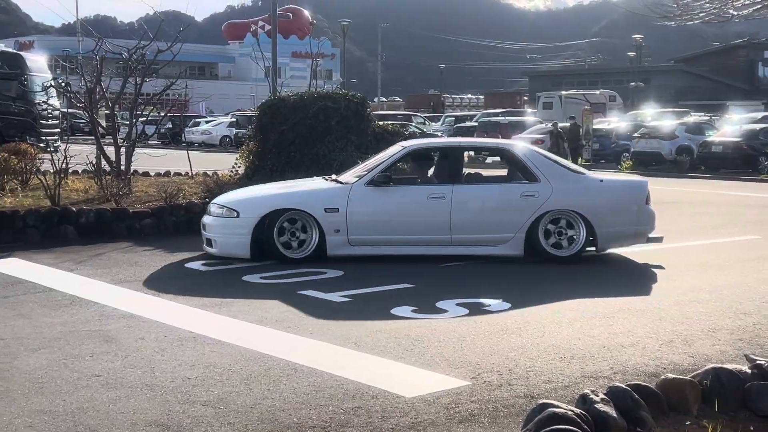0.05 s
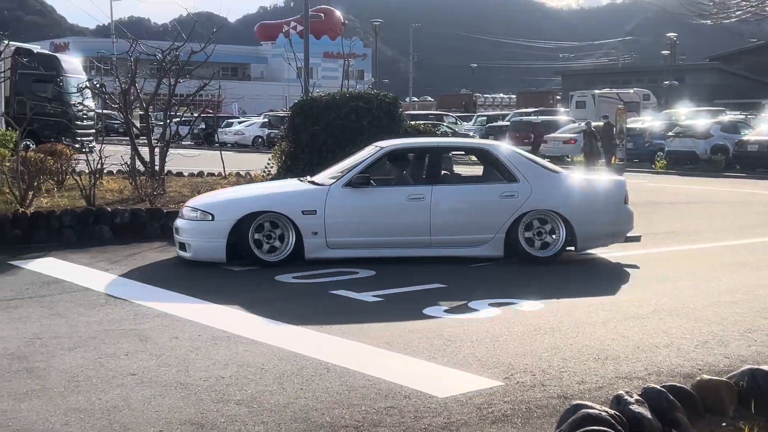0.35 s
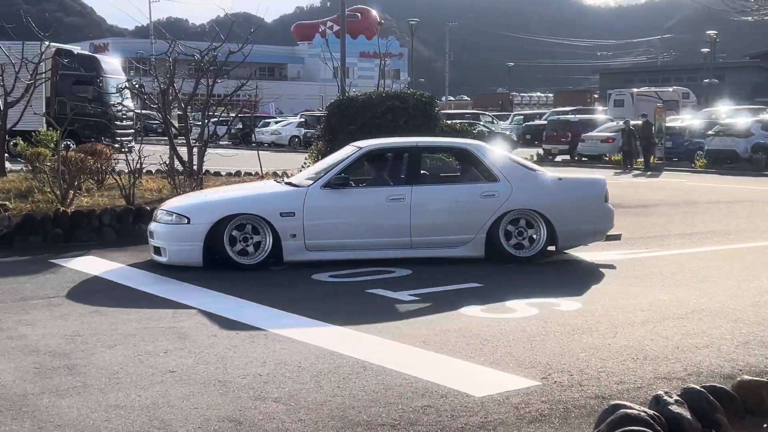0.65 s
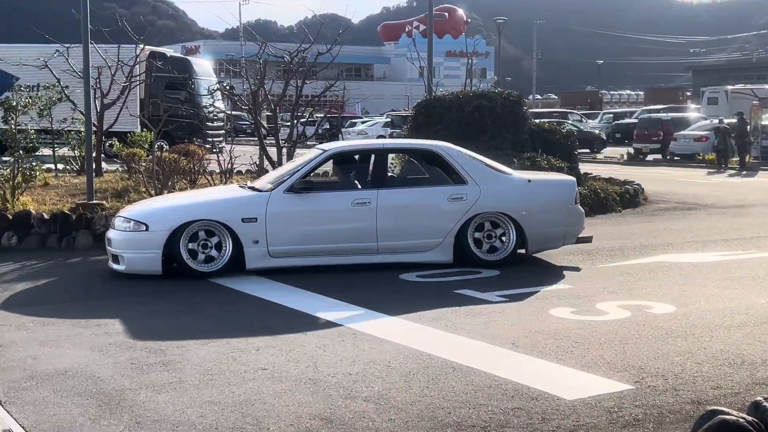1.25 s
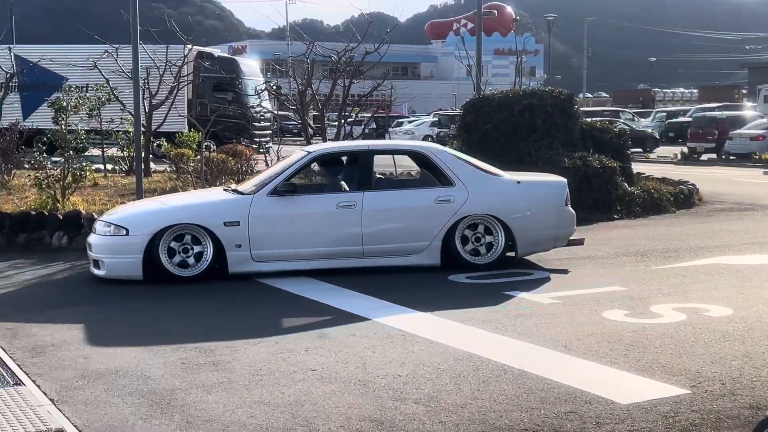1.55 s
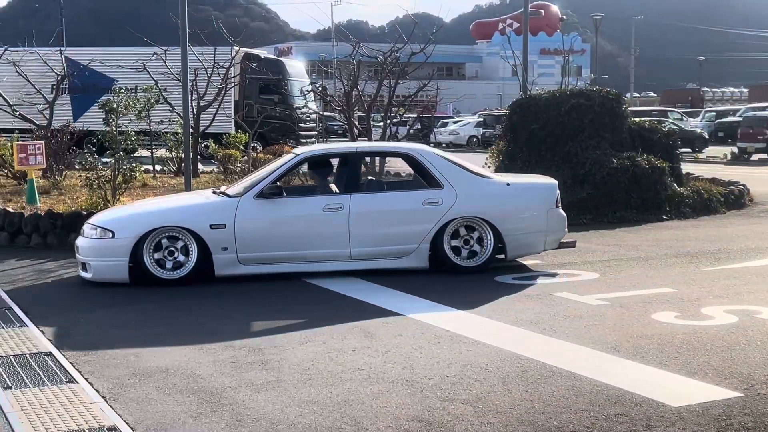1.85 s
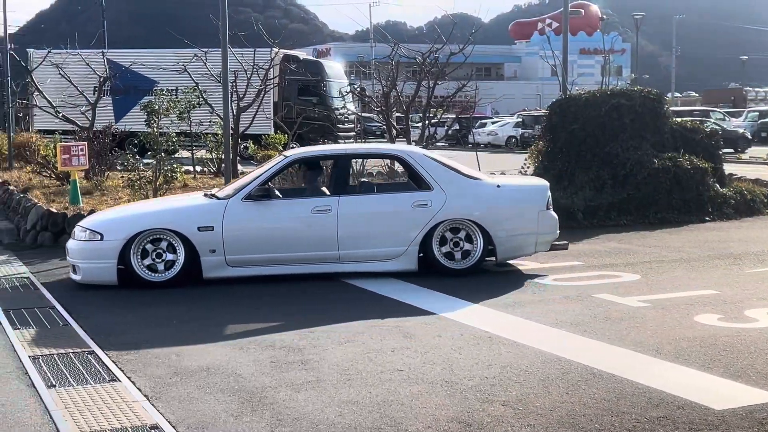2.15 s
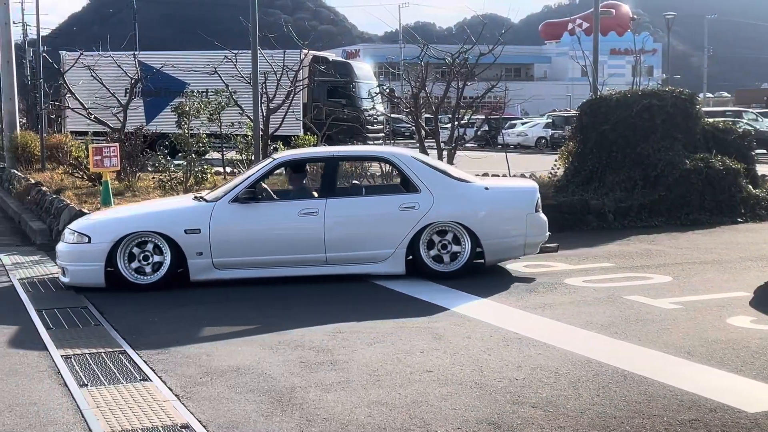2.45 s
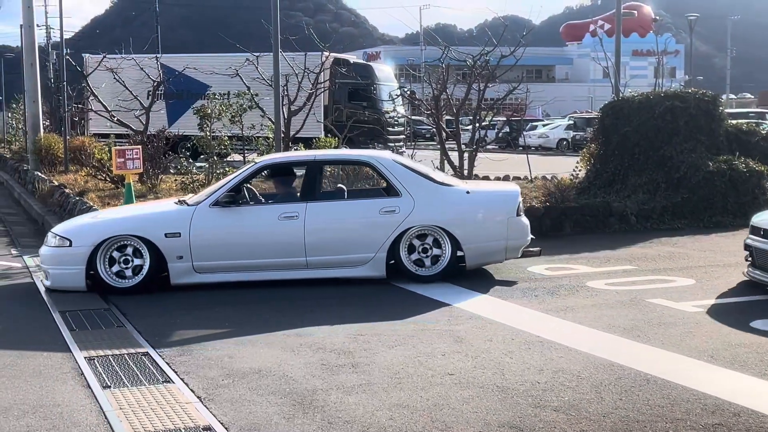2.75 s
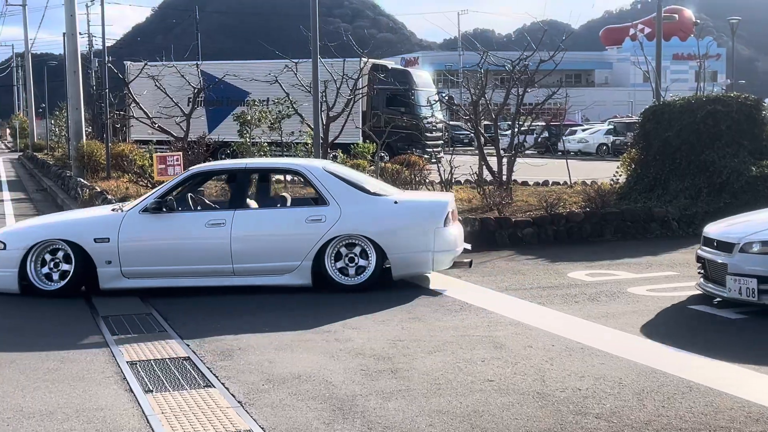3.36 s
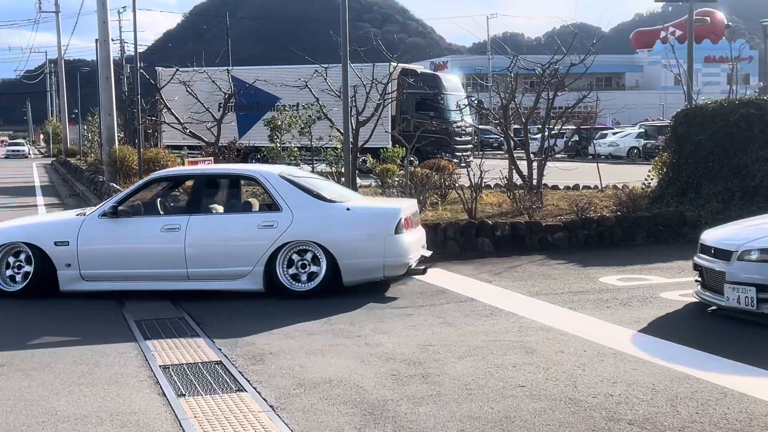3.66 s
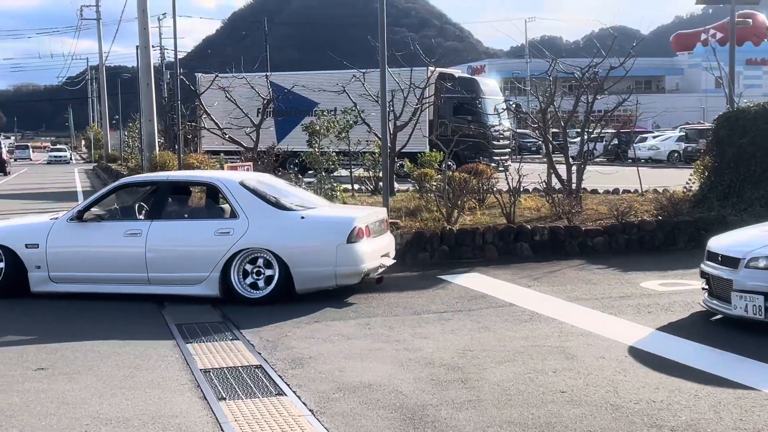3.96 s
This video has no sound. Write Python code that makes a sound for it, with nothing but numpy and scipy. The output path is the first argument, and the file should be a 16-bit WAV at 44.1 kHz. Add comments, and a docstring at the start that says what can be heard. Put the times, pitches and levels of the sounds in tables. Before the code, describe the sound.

A car rumbles slowly past, then throttles up lightly and clanks over a drain grate.

```python
"""A six-cylinder car with a big exhaust creeps through a parking lot at little over idle.
Uneven firings boom and burble in the pipe; the engine's clatter swells once per cycle.
Near three seconds the throttle opens: puffs of gas rasp and spit, a tyre clanks and crunches over
a drain grate, a weaker knock follows, and the boom stays louder as the tailpipe comes round.
Behind it all sit a faint hiss, a few high ticks and the lot's weak reflections."""
import sys
import numpy as np
from scipy import signal
from scipy.fft import rfft, irfft
from scipy.io import wavfile
from scipy.ndimage import uniform_filter1d, minimum_filter1d

SR = 44100
rng = np.random.default_rng(int(sys.argv[2]) if len(sys.argv) > 2 else 0)


def output_pcm(signal):
    """Save a mono or channel-first signal as 16-bit PCM at the path in sys.argv[1].

    Samples are clipped to [-1, 1] before scaling.
    """
    pcm = np.clip(np.atleast_2d(signal).T, -1, 1) * 32767
    wavfile.write(sys.argv[1], SR, np.round(pcm).astype(np.int16))


N = 176400
T = np.arange(N) / SR

# engine speed as firing rate: t/s, f/Hz
FIRING_RATE = [(0, 44.1), (.3, 44.5), (.55, 46), (.8, 47), (1, 49.5), (1.2, 52.2), (1.6, 52.4), (2, 51.8),
               (2.5, 52.3), (2.65, 51.9), (2.8, 51.1), (2.92, 45.5), (3.1, 49.8), (3.2, 54.3), (3.3, 57.6),
               (3.45, 55.4), (3.6, 51), (3.72, 51.7), (3.85, 60), (4, 58.8)]
# boom envelopes at one, two and three times the firing rate: t/s, level/dB
BOOM_1_ENV = [(0, -44), (2.85, -43), (3.1, -26), (3.22, -15), (3.36, -14.5), (3.5, -24), (3.68, -27),
              (3.8, -19), (3.9, -12), (4, -11)]
BOOM_2_ENV = [(0, -22), (.12, -28), (.3, -22.5), (.43, -28), (.6, -24), (.72, -29), (.95, -19),
              (1.1, -17.5), (1.2, -20), (1.45, -21), (1.95, -17.5), (2.38, -20.5), (2.47, -15.5),
              (2.56, -20.5), (2.8, -20.5), (2.88, -26), (2.97, -17), (3.07, -16.5), (3.18, -9.5),
              (3.28, -22), (3.46, -19), (3.56, -11), (3.74, -12), (3.82, -25), (4, -22)]
BOOM_3_ENV = [(0, -34), (.6, -33), (.75, -25.5), (1.03, -18.5), (1.25, -31), (2.85, -32), (3, -22.5),
              (3.15, -19.5), (3.3, -27), (3.5, -29), (3.7, -24), (3.8, -30), (3.95, -21.5)]
# the boom wavers more at low speed: firing rate/Hz, rms depth/dB
BOOM_WAVER = [(44, 3), (52, 1), (58, .4)]
# exhaust accent of each cylinder in firing order: level/dB
PULSE_ACCENTS = [-1, -3.5, 1, -4.5, 2.5, 1]
# envelope shared by burble and overtones: t/s, level/dB
PIPE_ENV = [(0, -27), (.6, -26.5), (1.1, -23), (1.8, -22), (2.3, -22.7), (2.85, -22.7), (3, -19.3),
            (3.2, -16), (3.4, -18.5), (3.65, -19.3), (3.8, -17.8), (4, -18.8)]
# exhaust tone at idle and on throttle: f/Hz, level/dB
PIPE_IDLE_EQ = [(20, -24), (36, -12.5), (52, -2), (70, 2.5), (88, 7), (112, -1.5), (135, 4), (160, -8),
                (185, -0.5), (215, -2), (245, -9), (285, -7), (310, -8.5), (338, -6), (370, -9),
                (450, -10.5), (520, -11), (590, -20), (680, -20), (780, -24.5), (1000, -35), (2000, -49),
                (5000, -86.5)]
PIPE_OPEN_EQ = [(20, -42.5), (36, -12.5), (52, 4.5), (90, 5), (125, 12), (160, -1), (220, -1.5), (255, -10),
                (290, -7), (335, -9.5), (385, -6), (450, -4), (530, -6), (610, -12), (680, -14),
                (780, -22.5), (1000, -25), (2000, -56.5), (5000, -86)]
# pipe overtones, riding on PIPE_ENV: multiple of the firing rate, idle level/dB, throttle level/dB
PIPE_OVERTONES = [(2.5, -14, -13), (3.5, -9, -11), (4, -6, -5), (4.5, -17, -20), (5, -17, -11),
                  (5.5, -13.5, -20), (6, -21, -13), (6.5, -21, -24), (7, -22, -18), (8, -23, -15),
                  (9, -22, -17), (9.5, -25, -17), (10, -25, -18)]
# narrow pipe resonances: f/Hz, width/Hz, boost/dB
PIPE_RESONANCES = [(334, 24, 7), (517, 36, 7)]
# rasp envelope: t/s, level/dB
RASP_ENV = [(2.9, -53), (2.935, -44), (3.08, -45.5), (3.16, -39), (3.25, -40), (3.36, -46), (3.65, -50.5),
            (4, -48.5)]
# tone of rasp and spits: f/Hz, level/dB
RASP_EQ = [(500, -40), (1500, 10), (2200, -0.5), (2600, -3.5), (3300, 2.5), (4000, -1), (5250, -3),
           (6100, -11), (7400, -11), (8800, -14), (10000, -9), (13000, -22.5), (15500, -22.5)]
# the tailpipe's hardest spits: t/s, level/dB
SPIT_CUES = [(2.924, -36), (2.945, -35), (2.986, -37), (3.109, -35), (3.129, -36), (3.148, -29.5),
             (3.184, -31), (3.239, -28), (3.257, -31), (3.31, -31)]
# clatter envelope: t/s, level/dB
CLATTER_ENV = [(0, -44.5), (.7, -44), (1, -41.5), (1.8, -41), (2.88, -42), (2.96, -32), (3.1, -33),
               (3.25, -27), (3.4, -35), (3.7, -37), (4, -34.5)]
# clatter accent of each cylinder in firing order: level/dB
CLATTER_ACCENTS = [7, 11, 2.5, 4, -2.5, -2]
# clatter tone at idle and on throttle: f/Hz, level/dB
CLATTER_IDLE_EQ = [(400, -25.5), (750, -3.5), (890, -5.5), (950, -1.5), (1015, 4.5), (1090, -5.5),
                   (1220, -5), (1350, -5.5), (1500, -12), (1750, -15.5), (2200, -38), (3000, -27),
                   (4000, -37.5), (8000, -52.5)]
CLATTER_OPEN_EQ = [(400, -12.5), (720, 1.5), (880, 4.5), (1020, 3), (1150, 1), (1240, 1.5), (1345, 5),
                   (1480, -20.5), (1650, -4.5), (1850, -13), (2400, -16), (4000, -48.5), (8000, -50.5)]
# metallic clanks, the tyre on the grate, then a weaker knock with the engine's beat: t/s, level/dB
CLANK_CUES = [(3.183, -17.5), (3.202, -28), (3.309, -28)]
# metallic ring of the clanks: f/Hz, level/dB, t60/s
CLANK_MODES = [(1303, -3, .07), (1365, 0, .055), (1490, -6, .07), (1680, -4, .06), (1790, -9, .05),
               (3273, -21, .05), (3585, -19, .05)]
# envelope of the grit under the tyre: t/s, level/dB
GRIT_ENV = [(3.1, -70), (3.15, -40), (3.19, -38), (3.25, -47), (3.33, -52), (3.42, -90)]
# grit tone: f/Hz, level/dB
GRIT_EQ = [(800, -23), (2500, 8), (5000, 1), (8000, -8.5), (12000, -11.5), (15500, -8.5)]
# envelope of the lot's far hiss: t/s, level/dB
HISS_ENV = [(0, -55.5), (.8, -56), (2, -54), (4, -54.5)]
# hiss tone: f/Hz, level/dB
HISS_EQ = [(1200, -13.5), (2000, 5.5), (2700, 3), (4800, -9.5), (8400, -14.5), (10000, -15), (15000, -27.5)]
# small high ticks: t/s, level/dB, decay/s, f/Hz
TICK_CUES = [(.53, -56, .028, 7200), (2.16, -63, .05, 7000), (2.353, -51.5, .006, 8000)]
# tick tone: multiple of the tick's pitch, level/dB
TICK_EQ = [(.4, -26), (.6, -7), (.8, -3), (1, 0), (1.15, -1), (1.35, -20), (1.6, -40)]
# phase between the two microphone ports: f/Hz, left lead/rad
STEREO_PHASE = [(0, 0), (6500, 0), (7600, -.3), (8400, -1.1), (9000, -2.1), (9500, -2.8), (10500, -3.3),
                (11000, -3.8), (11700, -4.8), (13000, -6.2), (15000, -7.3)]

BOOM_TRIM_DB, BURBLE_TRIM_DB, CLATTER_TRIM_DB, RASP_TRIM_DB = -0.09, 2.15, -0.24, 2
CYLINDER_COUNT = 6


def boom(turns, lag=0.34):
    """The low end: three nearly pure, wavering orders trail each pulse by lag of a firing interval."""
    waver_db = np.interp(curve(FIRING_RATE), *np.transpose(BOOM_WAVER))
    out = np.zeros(N)
    for order, envelope in enumerate([BOOM_1_ENV, BOOM_2_ENV, BOOM_3_ENV], 1):
        tone = unit(np.cos(2 * np.pi * order * (turns - lag)))
        out += amp(curve(envelope) + waver_db * drift(hz=9.1)) * tone
    return amp(BOOM_TRIM_DB) * out


def burble(turns, puff_share=.8):
    """Uneven pressure pulses and their puffs of gas ring the pipe, surging each cycle on throttle."""
    clicks = firings(turns, PULSE_ACCENTS)
    gas = puffs(clicks, turbulence(turns), decay_s=.009, steady=1.0)
    drive = (1 - puff_share) * unit(clicks) + puff_share * gas
    surge_db = throttle() * cycle_swell(turns, depth_db=2.4)
    gain = amp(BURBLE_TRIM_DB + curve(PIPE_ENV) + surge_db)
    return gain * throttle_eq(drive, PIPE_IDLE_EQ, PIPE_OPEN_EQ)


def overtones(turns, waver_db=1.5):
    """Whole and half multiples of the firing rate; each swells as it glides through a pipe resonance."""
    out = np.zeros(N)
    for order, idle_db, open_db in PIPE_OVERTONES:
        pitch = order * curve(FIRING_RATE)
        ring_db = sum(db / (1 + (2 * (pitch - hz) / width) ** 2) for hz, width, db in PIPE_RESONANCES)
        level = idle_db + (open_db - idle_db) * throttle() + ring_db + waver_db * drift(hz=12)
        out += amp(level) * unit(np.cos(2 * np.pi * (order * turns + rng.random())))
    return amp(curve(PIPE_ENV)) * out


def rasp(turns):
    """Bright puffs of gas at the tailpipe once the throttle opens, with a few hard spits on top."""
    gas = puffs(firings(turns, PULSE_ACCENTS), rng.standard_normal(N), decay_s=.0087, steady=1.3)
    gain = amp(RASP_TRIM_DB + curve(RASP_ENV)) * (T >= RASP_ENV[0][0])
    spits = sum(amp(db) * burst(start, decay_s=.0045) for start, db in SPIT_CUES)
    return gain * eq(gas, RASP_EQ) + spits * eq(rng.standard_normal(N), RASP_EQ)


def clatter(turns, lead=.4):
    """Metallic engine chatter, lead of a firing interval before each pulse, swelling once per cycle."""
    clicks = firings(turns + lead, CLATTER_ACCENTS, uneven=.25, jitter_s=.0001)
    swell = amp(cycle_swell(turns, depth_db=4.8))
    drive = swell * puffs(clicks, turbulence(turns), decay_s=.0077, steady=1.3)
    gain = amp(CLATTER_TRIM_DB + curve(CLATTER_ENV))
    return gain * throttle_eq(drive, CLATTER_IDLE_EQ, CLATTER_OPEN_EQ)


def firings(turns, accents_db, uneven=.1, jitter_s=.0006):
    """One click per firing, accented by its cylinder and a little loose in timing and strength."""
    beats = np.flatnonzero(np.diff(np.floor(turns), prepend=-1))
    timing, strength = rng.standard_normal((len(beats), 2)).T
    onsets = np.clip(beats + (timing * jitter_s * SR).astype(int), 0, N - 1)
    clicks = np.zeros(N)
    clicks[onsets] = amp(np.resize(accents_db, len(beats))) * np.exp(uneven * strength)
    return clicks


def puffs(clicks, flow, decay_s, steady):
    """Each click lets through a dying burst of the noisy flow, over a steady bed of it."""
    gate = unit(signal.lfilter([1], [1, -np.exp(-1 / (decay_s * SR))], clicks))
    return unit((gate + steady) * flow)


def turbulence(turns, loop_share=.5, size=5000):
    """Flow noise: part loops with the engine cycle, part is always fresh."""
    loop = rng.standard_normal(size)[(turns / CYLINDER_COUNT % 1 * size).astype(int)]
    return np.sqrt(loop_share) * loop + np.sqrt(1 - loop_share) * rng.standard_normal(N)


def cycle_swell(turns, depth_db, peak_phase=.57):
    """One rise and fall in dB per engine cycle."""
    return depth_db * np.cos(2 * np.pi * (turns / CYLINDER_COUNT - peak_phase))


def throttle(opens_s=2.9, rise_s=.029):
    """How far the throttle is open, 0 to 1."""
    return np.clip((T - opens_s) / rise_s, 0, 1)


def throttle_eq(x, idle, opened):
    """Crossfades from the idle tone to the open-throttle tone."""
    return (1 - throttle()) * eq(x, idle) + throttle() * eq(x, opened)


def clanks(attack_s=.0015):
    """Short metallic clanks: the tyre on the grate, then a weaker knock with the engine's beat."""
    out = np.zeros(N)
    for start, db in CLANK_CUES:
        t = np.maximum(T - start, 0)
        ring = sum(amp(level - 60 * t / t60) * np.sin(2 * np.pi * (hz * t + rng.random()))
                   for hz, level, t60 in CLANK_MODES)
        out += amp(db) * np.minimum(t / attack_s, 1) * ring
    return out


def grit(grains_per_s=2200, spread_db=3):
    """The crunch: separate grains crack under the tyre as it crosses the grate."""
    cracks = rng.random(N) < grains_per_s / SR
    strength = amp(spread_db * np.minimum(rng.exponential(1, N), 3))
    grains = cracks * strength * rng.choice([-1, 1], N)
    return amp(curve(GRIT_ENV)) * eq(grains, GRIT_EQ)


def lot_ambience():
    """A faint bed of far hiss with a few small high ticks."""
    ticks = np.zeros(N)
    for start, db, decay_s, hz in TICK_CUES:
        tone = [(hz * ratio, level) for ratio, level in TICK_EQ]
        ticks += amp(db) * burst(start, decay_s) * eq(rng.standard_normal(N), tone)
    return amp(curve(HISS_ENV)) * eq(rng.standard_normal(N), HISS_EQ) + ticks


def reflections(send, t60_s=.2, taps_per_s=2000, predelay_s=.004):
    """The lot scatters the sound back as a short, sparse reverb."""
    t = T[:SR // 2]
    taps = rng.standard_normal(len(t)) * (rng.random(len(t)) < taps_per_s / SR)
    taps *= amp(-60 * t / t60_s) * (t > predelay_s)
    return signal.fftconvolve(send, taps / np.linalg.norm(taps))[:N]


def amp(db):
    """Decibels to gain."""
    return 10 ** (np.asarray(db) / 20)


def unit(x):
    """Scales to rms 1."""
    return x / np.sqrt(np.mean(x ** 2) + 1e-20)


def curve(points):
    """Automation: straight lines between (t/s, value) points."""
    return np.interp(T, *np.transpose(points))


def burst(start, decay_s):
    """An envelope that jumps up at start and dies away."""
    return (T >= start) * np.exp(-abs(T - start) / decay_s)


def drift(hz):
    """Slow random modulation of rms 1, rolled off above hz."""
    rolloff = 1 + (np.fft.rfftfreq(N, 1 / SR) / hz) ** 4
    return unit(irfft(rfft(rng.standard_normal(N)) / rolloff, N))


def eq(x, points, size=8192):
    """Minimum-phase EQ through (f/Hz, level/dB) points; output of rms 1."""
    hz, db = np.transpose(points)
    log_hz = np.log(abs(np.fft.fftfreq(size, 1 / SR)) + 1)
    log_gain = np.log(amp(np.interp(log_hz, np.log(hz), db)))
    response = np.exp(np.conj(signal.hilbert(log_gain)))
    impulse = np.fft.ifft(response).real[:size // 2]
    return unit(signal.fftconvolve(x, impulse)[:N])


def scene(reverb_db=-10, side_db=-13, bass_side_db=-17, left_db=-.75):
    """Mid/side mix: the car up front, widened by reflections and phase-shifted bass."""
    turns = np.cumsum(curve(FIRING_RATE)) / SR  # one turn per firing
    low = boom(turns) + overtones(turns)
    pipe = burble(turns)
    bright = clatter(turns) + rasp(turns) + clanks() + grit() + lot_ambience()
    mid = low + pipe + bright + amp(reverb_db) * reflections(pipe + bright)
    side = amp(side_db) * reflections(pipe + .45 * bright)
    side += amp(bass_side_db) * signal.hilbert(low).imag
    return np.array([amp(left_db / 2) * (mid + side), amp(-left_db / 2) * (mid - side)])


def record(dry, ceiling=.93, cutoff_hz=15700):
    """Two microphone ports hear the treble out of phase; a peak limiter and a low-pass follow."""
    phase = np.interp(np.fft.rfftfreq(2 * N, 1 / SR), *np.transpose(STEREO_PHASE))
    wide = irfft(rfft(dry, 2 * N) * np.exp(.5j * np.array([phase, -phase])))[:, :N]
    gain = np.minimum(1, ceiling / (abs(wide).max(0) + 1e-9))
    limited = wide * uniform_filter1d(minimum_filter1d(gain, size=601), size=601)
    lowpass = signal.firwin(511, cutoff_hz, window=("kaiser", 9), fs=SR)
    return signal.oaconvolve(limited, lowpass[None], "same")


dry = scene()
out = record(dry)
output_pcm(out)
```